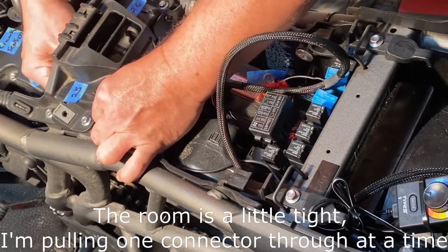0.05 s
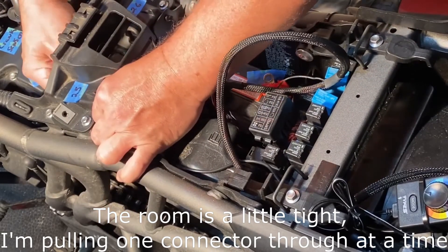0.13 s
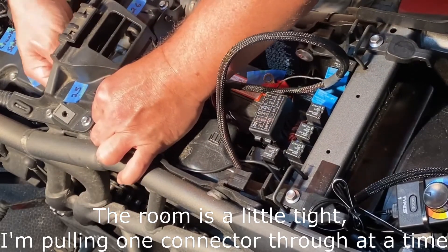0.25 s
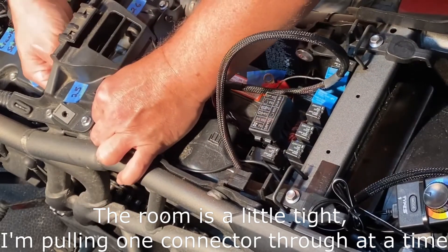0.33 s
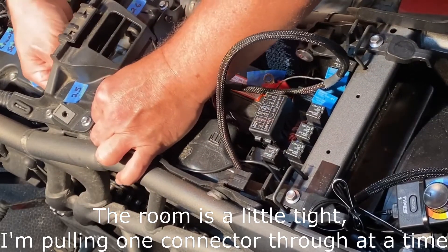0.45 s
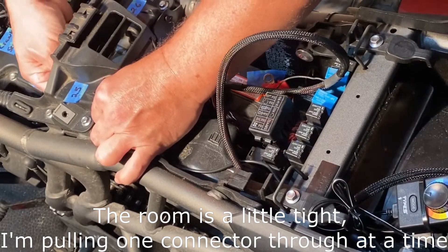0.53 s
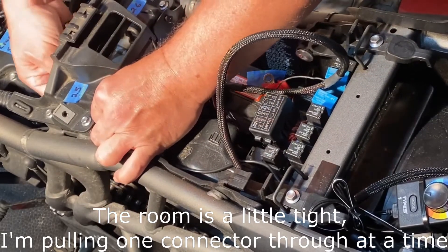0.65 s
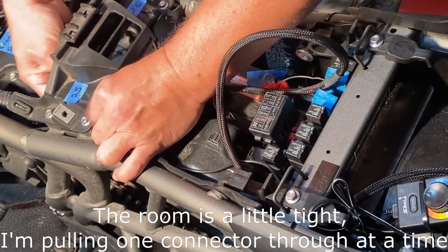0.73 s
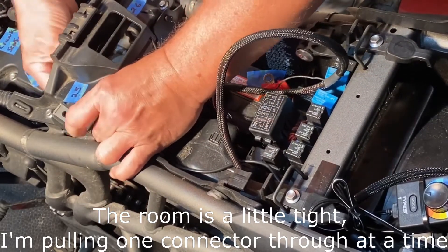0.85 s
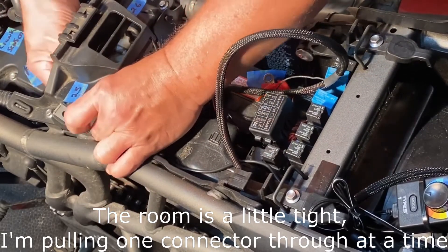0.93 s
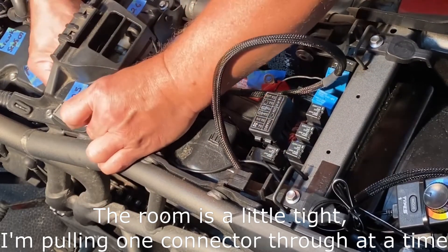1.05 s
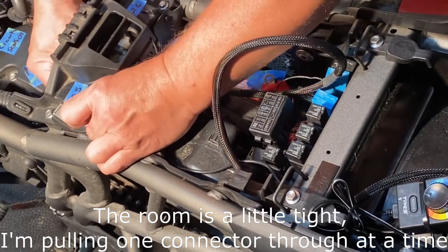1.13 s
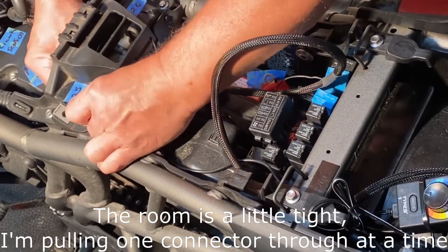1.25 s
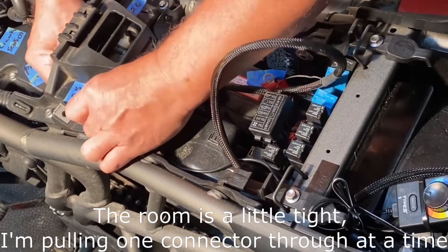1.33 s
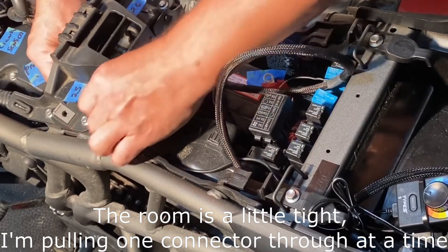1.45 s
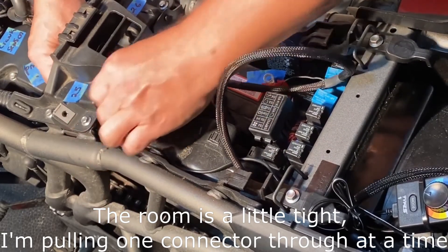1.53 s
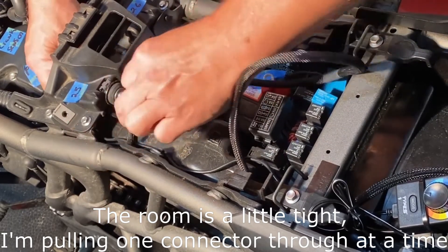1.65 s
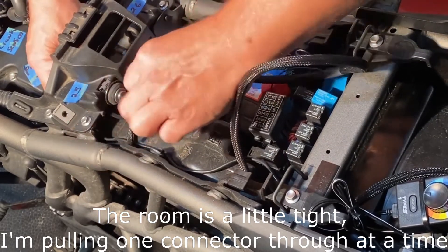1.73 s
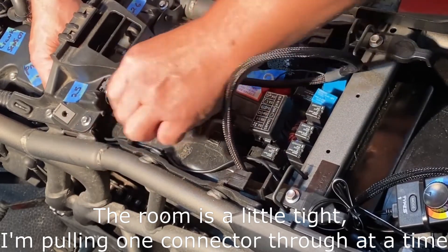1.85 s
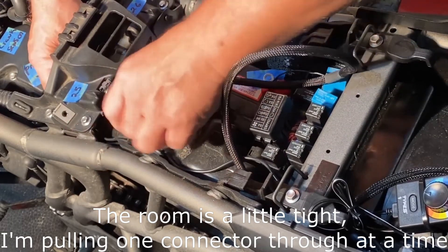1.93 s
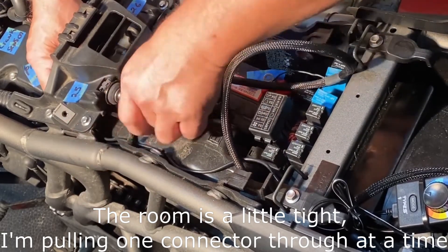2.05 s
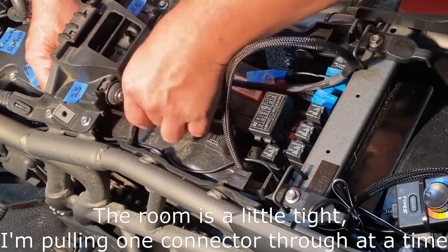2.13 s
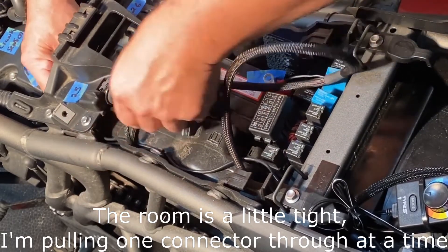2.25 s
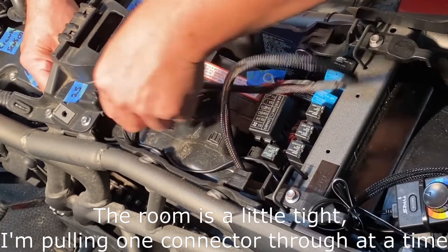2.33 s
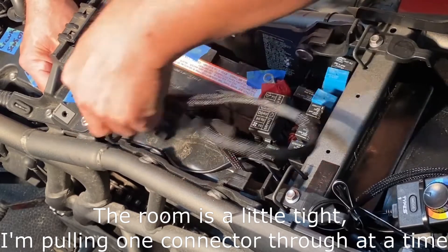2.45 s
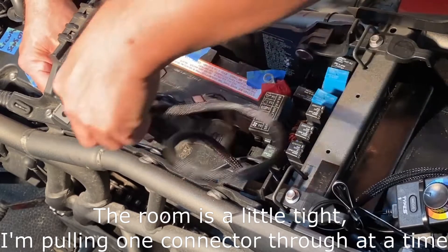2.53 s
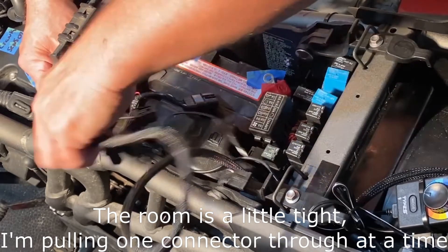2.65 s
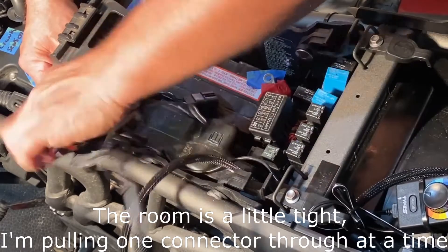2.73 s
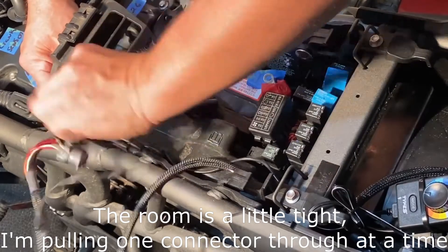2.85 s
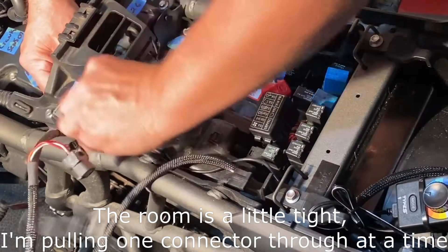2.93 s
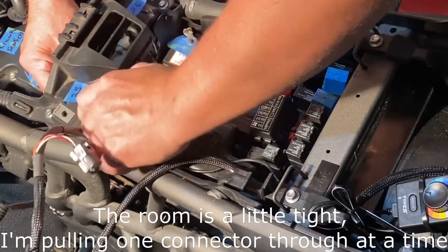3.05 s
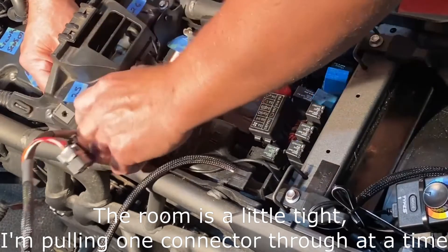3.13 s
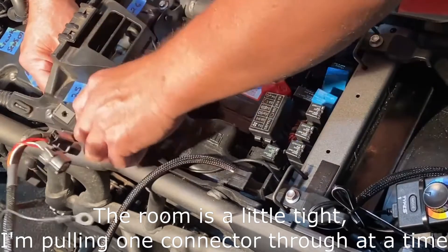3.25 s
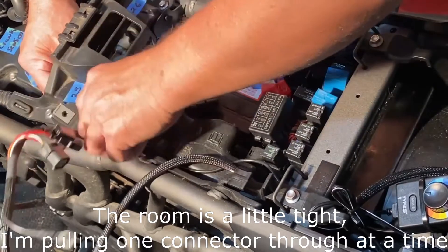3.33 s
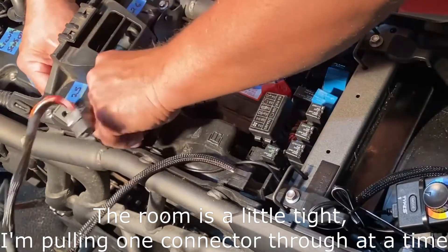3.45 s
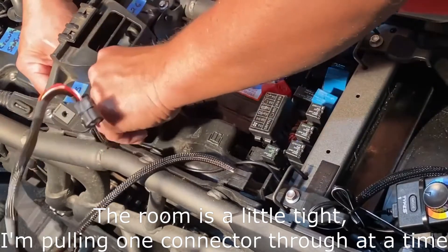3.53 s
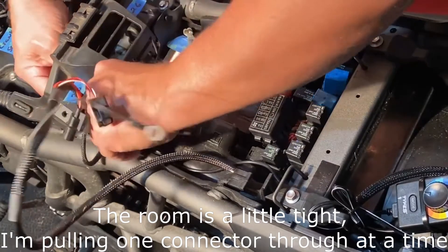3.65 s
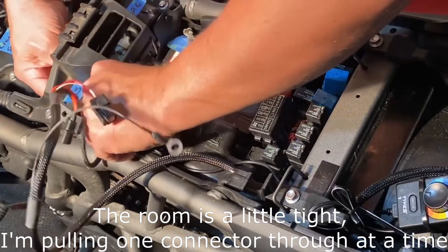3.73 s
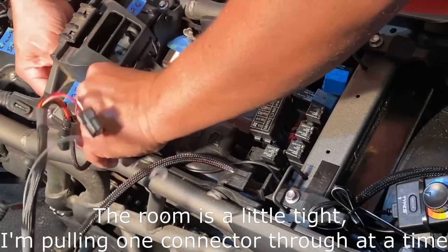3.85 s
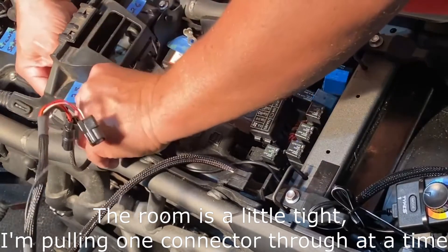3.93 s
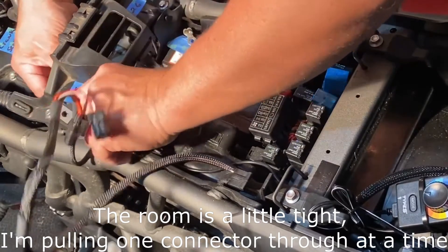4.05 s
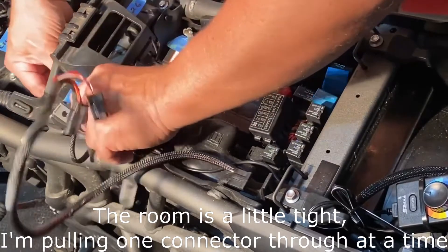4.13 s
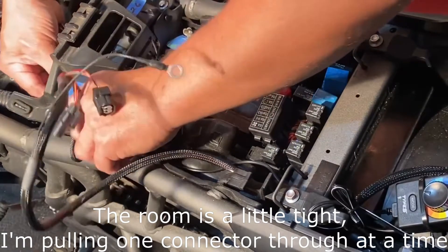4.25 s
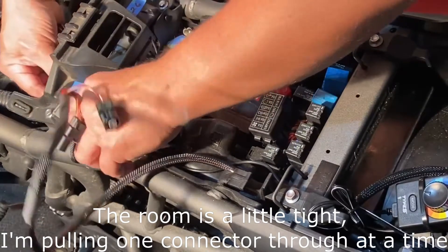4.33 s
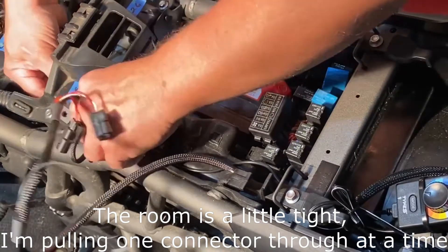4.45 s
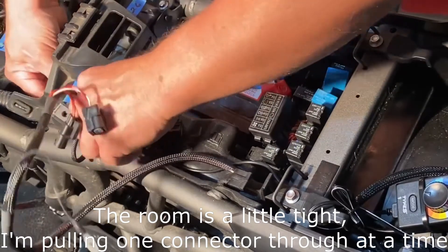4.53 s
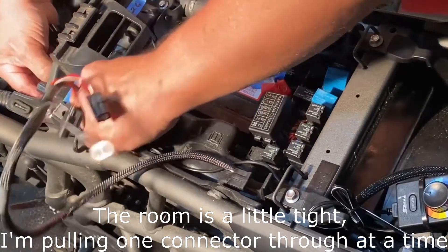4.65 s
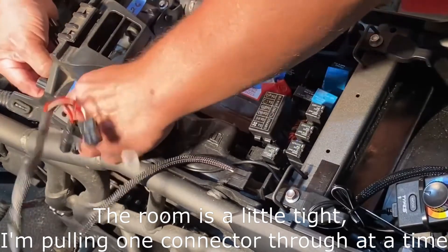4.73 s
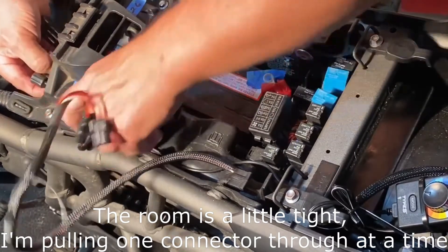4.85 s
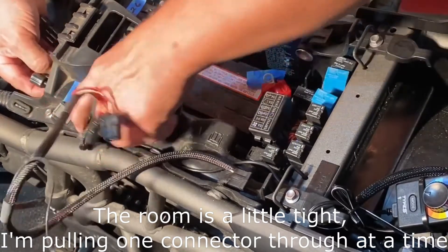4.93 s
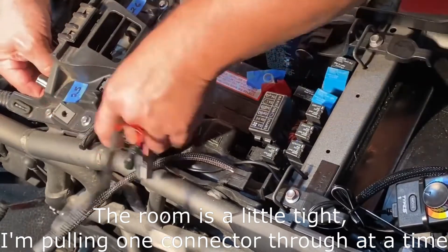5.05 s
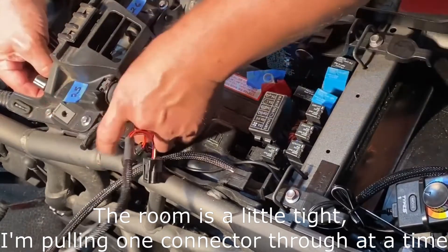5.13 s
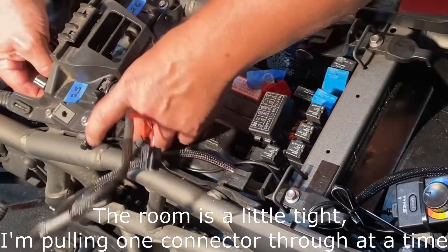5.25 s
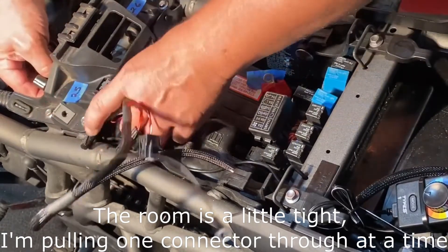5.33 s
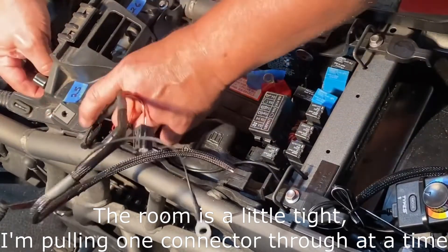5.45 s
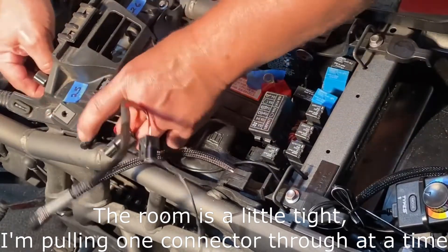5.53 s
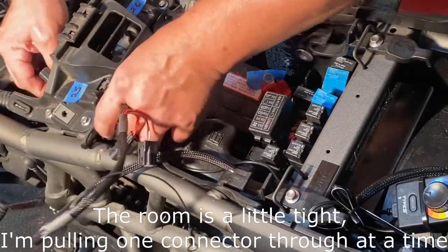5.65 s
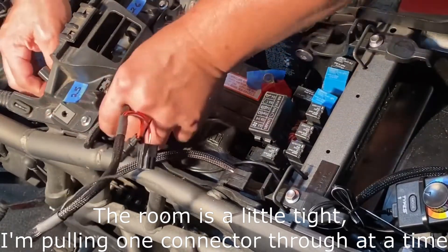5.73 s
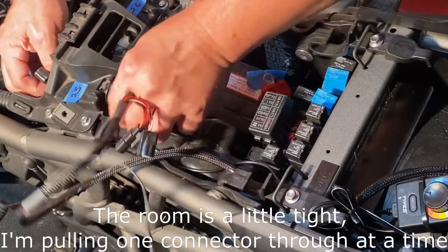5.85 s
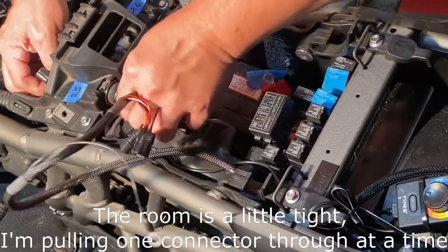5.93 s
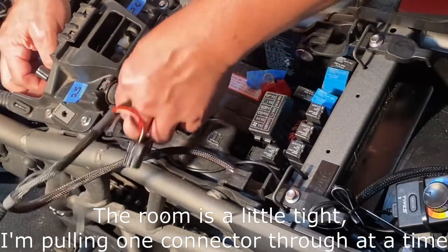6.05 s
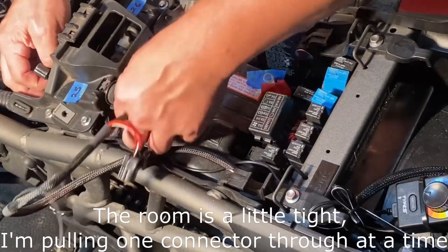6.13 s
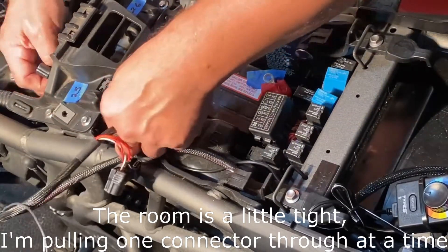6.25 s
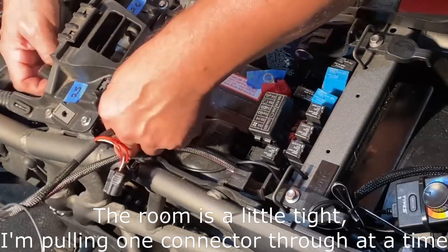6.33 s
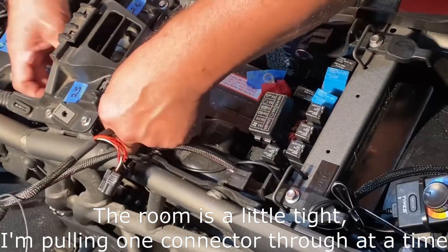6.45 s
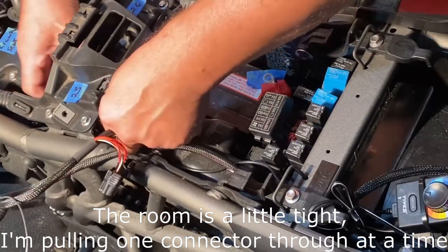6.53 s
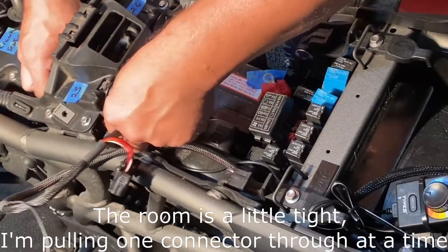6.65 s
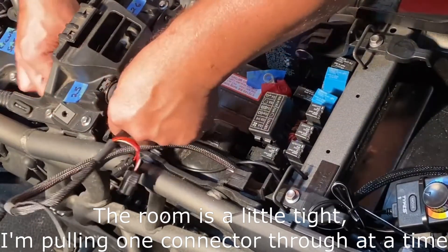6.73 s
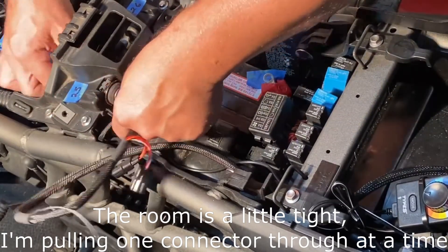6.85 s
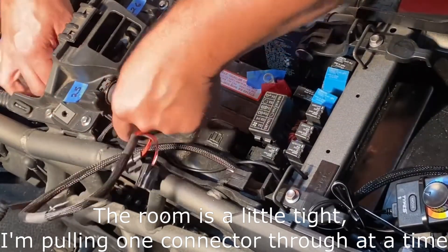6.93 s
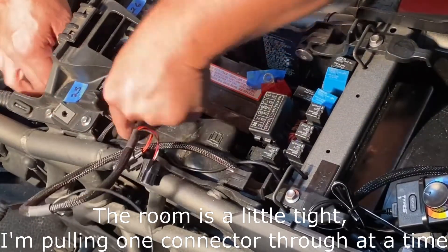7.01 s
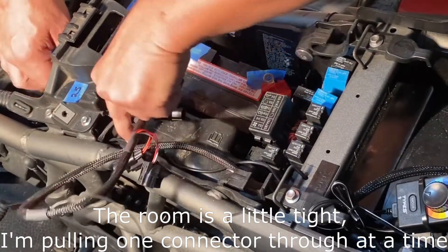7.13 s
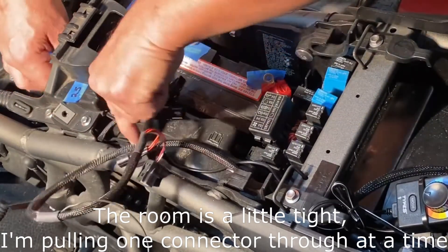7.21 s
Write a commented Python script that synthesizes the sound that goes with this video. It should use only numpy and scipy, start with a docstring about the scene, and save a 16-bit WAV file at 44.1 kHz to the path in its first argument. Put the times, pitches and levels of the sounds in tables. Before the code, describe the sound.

Hands work a wiring harness through a tight gap: dry plastic clacks, small rattles, raspy sleeve drag and tiny metallic ticks in a garage.

```python
"""Plastic connectors knock on hollow plastic housings as hands pull a wiring harness through a tight gap
in a machine frame. Each knock is a short push and rough contact that makes plastic parts ring.
A braided sleeve scrapes in many tiny jolts, and metal terminals tick with two high tones.
The garage answers these sounds with fading reflections.
Filtered noise makes far traffic and a gliding sine makes a faint hum underneath."""
import sys
import numpy as np
from scipy import signal
from scipy.fft import rfft, irfft, next_fast_len
from scipy.io import wavfile
from scipy.ndimage import uniform_filter1d

SR = 44100
rng = np.random.default_rng(int(sys.argv[2]) if len(sys.argv) > 2 else 0)


def digitize_waveform(pressure):
    """Quantize a signal to 16-bit integers and store it at the path in sys.argv[1].

    Rows of a 2-D input are taken as channels; values are limited to [-1, 1].
    """
    field = np.atleast_2d(pressure).T
    bounded = np.clip(field, -1, 1)
    quanta = np.round(bounded * 32767).astype(np.int16)
    wavfile.write(sys.argv[1], SR, quanta)


N = 321048  # length in samples

# The clear knocks. Each row: start in seconds, blow level in dB before the final mix, then levels in dB
# relative to the blow for hollow boom, panel, latch and edge snap, and contact time in ms.
KNOCKS = [(0.016, -59.5, 5.5, -10, -7, 2, 44), (0.1784, -49.5, 5, -11, -14, -11, 25),
          (0.1984, -39.5, -14, -12, -3.5, -4.5, 8.9), (0.236, -52, -8, 0, -12, -14, 4.6),
          (0.3133, -58, -4, 6, -4, -8, 8.5), (0.4459, -46, -27, -5, -11.5, -2.5, 5.5),
          (0.5621, -32, -17, -6.5, -15, -10.5, 4.7), (0.6509, -41, -10, 5, -6, -17, 4.7),
          (0.7427, -47.5, -10.0, -21, -14, -4, 34), (0.8195, -27.5, -21, -16.5, -11.5, -12, 5),
          (0.9328, -44.5, -4, -1.5, -9, -17, 12), (0.9677, -47, -14, -0.5, -7, -14, 21),
          (1.0121, -44, -12, -7, -14, -11, 8), (1.088, -46.5, -23, -6, -7, -9, 39),
          (1.165, -52, 3.5, -2, -22, -24, 8), (1.2087, -53, -6, 1.5, -19, -7, 7),
          (1.285, -42, -9, -8, -24, -15, 5.4), (1.3675, -35, -10.5, 0, -22, -23, 31),
          (1.4681, -36.5, -19, -2.5, -30, -33.0, 5.2), (1.5005, -37.5, -44.0, 4, -0.5, -5, 3.1),
          (1.5239, -13.5, -34, -7.5, -9.5, -10.5, 4.2), (1.5643, -19, -23.5, -11, -15.5, -12, 5.3),
          (1.5814, -27.5, -14.5, -4.5, -16, -21, 6.9), (1.7569, -45, -8, -1, -1, -7.5, 7.4),
          (1.909, -66, -17, -16, -18, -1, 3.8), (1.997, -38.5, -1, 2, -16, -20, 11),
          (2.0044, -40, 1.5, 10, -18, -9, 13.5), (2.0652, -27.5, -12.5, -9, -14.5, -9.5, 3.9),
          (2.1254, -51.5, -17, 13, -14, -17, 7.3), (2.2059, -19.5, -21, -4, -14.5, -20.5, 8),
          (2.2353, -35, -22, -1, -7, -10, 9.7), (2.2553, -29.5, -10, -12, -17, -19, 4.8),
          (2.3012, -22, -27, -8.5, -14, -30, 5.4), (2.3999, -28, -29, -4.5, -11, -17, 8.5),
          (2.4184, -42.5, -25, -3, -13, 5, 6), (2.4364, -35, -5, -5, -2, -1.5, 9.3),
          (2.4764, -27, -9, -5, -6.5, -16, 26), (2.4857, -41, -20.0, -13, -11, 2.5, 6.0),
          (2.5062, -15.5, -21.5, -14, -14.5, -26, 4.2), (2.5326, -22.5, -12.5, -3, -12.5, -17, 6.2),
          (2.9324, -39.5, -14, -7.5, -6.5, -11, 17), (2.9736, -62, -33.0, -24.0, 12, 11, 7.6),
          (2.9976, -13.5, -33, -10, -8, -13, 7.5), (3.0999, -20.5, -19.5, -11, -6, -6.5, 5.6),
          (3.116, -21.5, -22, -13.5, -6, -7, 6.2), (3.1954, -36, -13, -1.5, -19, -15, 25),
          (3.2294, -38.5, -0.5, 3, -9.5, -12, 17), (3.471, -24, -31, -10.5, -10.5, -23, 4.7),
          (3.513, -28, -15.5, -2, -17, -26, 14.5), (3.5843, -40, -20, 0, -3, -8, 19),
          (3.6022, -20, -17, -5, -17.5, -26, 9.2), (3.6401, -20.5, -12, -2, -11.5, -18.5, 21),
          (3.6554, -31, -7, -9, -1.5, -6, 16), (3.686, -27, -20, 2, -4.5, -27.0, 3.7),
          (3.7469, -22.5, -26, -8.5, -25, -13, 3.3), (3.8013, -28.5, -17, -12, -22, -17.5, 13),
          (3.8412, -30.5, -13, -18, -10.5, -15, 13), (3.9085, -32.5, -34, -19, -5.5, -12.5, 4.7),
          (4.0372, -35, -11, -14, -8, -19, 9.5), (4.0856, -27, -10, -10, -33, -30, 8.7),
          (4.1011, -24.5, -18.0, -4, -3.5, -18, 5.8), (4.1385, -17, -36.0, -16, -15, -21, 7.5),
          (4.1525, -12.5, -16.5, -25.0, -15.5, -25, 6), (4.1654, -23.5, -17, -8, -10, -11, 11.5),
          (4.2009, -14.5, -43, -18, -11, -28, 3.7), (4.2173, -19, -34, -8.5, -6.5, -21, 5.1),
          (4.2408, -22.5, 0, 1.5, -3, -9.5, 14.6), (4.3164, -49.5, 10.5, -11, 3, 5, 17),
          (4.4108, -56, 9, -10, 5, -12, 23), (4.4442, -39, -30, -24, -9, -6.5, 8.6),
          (4.4792, -39, -34.0, 9, -0.5, -6, 7.3), (4.5116, -27.5, -15, -4.5, -11, -22, 4.6),
          (4.6024, -31.5, -20, -0.5, -10, -14, 14), (4.6135, -24.5, -5.5, 3.5, -10.5, -19, 11.5),
          (4.6237, -24, -6, -7, -13, -16.5, 16), (4.6634, -42.5, -13, 5, -3, 1.5, 19),
          (4.6862, -39, -25, -19, -7, 8.5, 9.2), (4.7351, -38, -16, -1.5, -3, 0.5, 10.5),
          (4.752, -39, -17, -10, -18, -3.5, 7.7), (4.8399, -41.5, -10, 3.5, -20, -18.5, 13.5),
          (4.9018, -36.5, -12, 4, -2, -4.5, 11.7), (4.939, -37.5, -25, -1.5, -17, -28, 4.4),
          (5.0005, -38.5, -27, 0, -1.5, -3.5, 2.8), (5.033, -30, -24, -2, -19, -24, 4.4),
          (5.0454, -29.5, -13, 1.5, -11.5, -12, 4.4), (5.0664, -31, -34, 4.5, -5, -13, 8.4),
          (5.0924, -29, -10.5, -0.5, -15, -12, 21), (5.1264, -30.5, -17, -4, -12, -11, 4.6),
          (5.1662, -27, -34, -5, -8, -19, 2.5), (5.2739, -19, -18.5, 1, -16, -18.5, 6.2),
          (5.2824, -37.5, -19, 9, -9, -20, 3.7), (5.3687, -24.5, -26, -13, -13.5, -25, 3.8),
          (5.4075, -36.5, -21, -21, -12, -20, 6.7), (5.4744, -43, -8, 2, -5, -21, 9.3),
          (5.5024, -30.5, -21, -5, -14, -16, 5.4), (5.6236, -36, -25, -11, -16, -9.5, 8.1),
          (5.661, -7, -27.5, -3.5, -11.5, -10.5, 5.7), (5.9074, -29.5, -29, -25, -18, -10.5, 11),
          (5.9254, -29, -11.5, 1.5, -16, -16.5, 32), (5.9604, -37.5, 0, 10, -13, -18, 4),
          (5.9763, -32, -10, -5, -13, -2.5, 3.8), (6.0442, -30.5, -1, -5.5, -29, -12, 8),
          (6.1244, -48, -6, 8, -13, -19.0, 25), (6.2, -33.5, -23, -8, -13, -13, 8.6),
          (6.221, -44.5, -12, -5, -5.5, 0, 12), (6.3031, -40.5, -9, -10, -1, -3.5, 6.3),
          (6.3389, -42.5, -20, -10, -4, -7, 3.6), (6.3864, -40, -2.5, 8.5, -30, -26, 7.4),
          (6.4242, -41, -9, -10, -12, -9, 6.2), (6.4532, -54, 9, 12.5, -17, 0, 36),
          (6.5054, -48.5, -1.5, 10.5, -9, -9, 38), (6.5375, -34.5, -18, -3.5, -7, -3, 9.1),
          (6.5554, -39.5, -13, 3.5, -5, 4, 6.3), (6.589, -30, -30, -26, -21, -27, 3.7),
          (6.766, -38.5, -16, -1, -10, -1, 9.3), (6.82, -40, -26, 3.5, -12, -15, 8.1),
          (6.8329, -34.5, -13, 0, -10, -25, 4), (6.8473, -28.5, -34, -3.5, -19, -19.0, 14),
          (6.87, -41.5, -13, 0, -1, -11, 6.8), (6.9505, -39, -9, 0, -14, -16, 19),
          (6.9631, -32, -20, 4.5, -6, -19.0, 9.3), (6.975, -24, -12, 0.5, -14.5, -15.5, 7.6),
          (6.9824, -35, -5, 5, -9, -15, 9.1), (7.219, -35.5, -21, -6, -13, -16.5, 21),
          (7.2654, -36, -16, -9, -15, -32, 11)]
# The ways the plastic parts ring. Each row: family (0 boom, 1 panel, 2 shell, 3 latch), pitch in Hz,
# strength in dB within its family, time to fade by 60 dB in seconds, random detuning as a share of the pitch.
RINGING_MODES = [(0, 401, 6, 0.032, 0.014), (1, 726, 14, 0.019, 0.032), (1, 785, 16, 0.013, 0.027),
                 (1, 922, -6, 0.018, 0.0067), (2, 1266, 4, 0.0054, 0.056), (2, 1632, 2.5, 0.025, 0.022),
                 (2, 1688, -1.5, 0.026, 0.0069), (2, 1837, 2.5, 0.01, 0.05), (3, 2178, 1, 0.012, 0.024),
                 (3, 2572, 1.5, 0.012, 0.055), (3, 2990, 2.5, 0.0076, 0.018), (3, 3587, -1, 0.0084, 0.12),
                 (3, 3900, -3.5, 0.0029, 0.12), (3, 4630, 4, 0.0022, 0.1)]
# The broad snap of hard plastic edges. Each row: frequency in Hz, relative strength in dB.
EDGE_SNAP = [(2000, -38), (3000, 0.5), (5500, 10.5), (8000, 10.5), (10000, 8), (12500, 3.5), (16000, -17)]
# The sleeve dragged over the housings. Each row: time in seconds, level of the ringing in dB
# before the final mix, level of the bright rasp in dB relative to that ringing.
SCRAPE = [(0.0, -70, 4), (0.35, -70, -13), (0.7, -69, -4), (0.799, -57.5, -1.5), (1.081, -56, -8),
          (1.26, -58.5, -3), (1.381, -56, -8.5), (1.56, -54, -3), (1.8, -60.5, -18), (1.97, -68, -11),
          (2.1, -56, -2.5), (2.43, -46.5, -17), (2.74, -59, -9), (3.0, -60.5, 6), (3.12, -50.5, -33),
          (3.528, -57.5, -3.5), (3.69, -53, 4), (3.89, -69, -9), (4.12, -44.5, -8), (4.28, -47.5, -8.5),
          (4.56, -52, -20), (4.63, -42.5, -7), (4.74, -59, -4), (4.85, -46.5, -6), (4.96, -56.5, -7),
          (5.1, -45, -1.5), (5.22, -70, 0), (5.48, -46, -14.5), (5.68, -62, -4), (5.88, -48, -14),
          (6.14, -58, -5.5), (6.45, -57.5, -1.5), (6.68, -59.5, -3.5), (6.82, -54, -5), (6.93, -57, -20),
          (7.28, -58, -1.5)]
# Metal terminals ticking on something hard. Each row: start in seconds, peak level in dB before the
# final mix, pitch in Hz, level of a second, lower ring in dB relative to the first.
TERMINAL_TICKS = [(0.2, -38, 7580, 2), (2.0648, -30, 6100, -33), (2.1688, -33.5, 5800, -18),
                  (2.939, -29, 8010, -31), (4.1323, -33, 8050, -15), (4.1664, -37, 5500, -22.5),
                  (4.318, -37, 7820, -17), (5.0165, -36.5, 9100, -5), (5.128, -33, 7750, -21),
                  (5.909, -31, 4950, -14), (5.977, -34.5, 5730, -28), (6.0093, -26.5, 5900, -25),
                  (6.061, -39, 7570, -13), (6.221, -38, 7900, -12), (6.557, -18, 7780, -12),
                  (6.766, -31, 7700, -22), (7.217, -44, 9200, -14)]
# How the garage echoes. Each row: frequency in Hz, time to fade by 60 dB in seconds, relative strength in dB.
GARAGE = [(275, 0.72, 7.5), (860, 0.9, 0.5), (1260, 0.81, 7), (1540, 0.82, 1.5), (2800, 0.65, 3),
          (4400, 0.68, 2.5), (9100, 0.46, 3.5), (15100, 0.13, 10.5)]
# The balance of the traffic noise. Each row: frequency in Hz, relative strength in dB per Hz.
TRAFFIC = [(25, -30), (42, -9), (57, -1), (75, -6.5), (120, -9), (170, -8.5), (300, -13.5), (480, -16),
           (1040, -21.5), (2300, -36), (6000, -47), (16000, -56)]
# The far hum. Each row: time in seconds, pitch in Hz, level in dB before smoothing and the tone curve.
HUM = [(.9, 166, -78), (1.02, 166.7, -67.5), (2.25, 164, -63.5), (2.45, 160.5, -67.5), (3.2, 160, -75)]
# How alike the two ports hear. Each row: frequency in Hz, left-right likeness from 0 to 1.
LIKENESS = [(60, 0.98), (130, 0.93), (430, 0.81), (640, 0.39), (1410, 0.93), (3100, 1), (6820, 0.82),
            (15000, 0.68)]
# How far the left port runs ahead. Each row: frequency in Hz, phase lead in radians.
LEFT_LEAD = [(0, 0), (950, 0.35), (1550, -0.2), (3100, 0.6), (5080, 0.4), (6030, -0.4), (7750, 0.1),
             (8100, 1.9), (8870, 2.0), (11600, -0.7), (13000, -2.9), (14300, -3.8), (15200, -6.1),
             (16500, -6.3)]
# How much louder the left port is. Each row: frequency in Hz, level difference in dB.
LEFT_LOUDER = [(60, -2), (180, -1.5), (420, -2), (760, -3), (1150, 5), (1650, 0), (4970, 0), (15000, 0)]
# Overall tone: the deepest bass is cut and the top treble slightly uneven. Each row: frequency in Hz, gain in dB.
TONE_CURVE = [(22, -35), (45, 2.5), (12300, -4), (13300, -1), (14300, 5)]

RING_SAMPLES = 3072  # room for one knock
SHELL_DB = -8  # shell ringing, relative to the blow
BOOM_RISE_S = 0.0048  # the hollow fills slowly
MODE_SPREAD_DB = 1.5  # each blow lands elsewhere and favours other modes
SNAP_SPREAD_DB = 1.5  # each edge favours its own bands
SMALL_PARTS_HZ = 363  # below this the parts are too small to radiate

TAP_COUNT = 70
TAP_DB, TAP_SPREAD_DB = 8, 2.5  # light taps relative to the scrape level
TAP_COLOUR_DB = (-14, -11, -11, -15)  # boom, panel, latch and edge snap, relative to the tap
TAP_COLOUR_SPREAD_DB = 3.5
TAP_CONTACT_MS = (2.5, 8)  # shortest, longest

SLIPS_PER_S, CLUMP_DB = 3200, 4.0  # average rate, and how much the slips bunch
TICKS_PER_S, TICK_SPREAD_DB = 400, 4.5  # braid strands that let go one by one
TICK_DB = 0  # strand ticks relative to the slips

TERMINAL_T60_S, LOWER_RING_SHARE = 0.018, 0.82  # fade by 60 dB; lower pitch as a share of the upper one
GARAGE_DB, TRAFFIC_DB = -8, -57.5  # echo gain and traffic level, before the final mix
BAND_LIMIT_HZ = 16300


def knocks():
    """A blow and a short chatter make the housings ring; the edges snap hardest at first touch."""
    t, out = np.arange(RING_SAMPLES) / SR, np.zeros((2, N))
    rows = np.r_[KNOCKS, taps()]
    noise = rng.standard_normal((len(rows), 5, RING_SAMPLES))
    push = 2.22 * np.exp(-0.5 * ((t - 0.0006) / 0.00008) ** 2)  # one hard, very short push
    crack = 1.0 * (t == t[24])  # its sharp edge, a single sample
    for (s, blow_db, boom_db, panel_db, latch_db, edge_db, contact_ms), chance in zip(rows, noise):
        age = t / (max(contact_ms, 0.5) / 1000)  # 1 at the contact time
        touch = (1 - np.exp(-age / 0.065)) * np.exp(-age ** 3)
        rough = chance[:4] * abs(chance[:4])  # squaring the size makes the noise spikier
        drive = push + touch * rough[:2]
        rings = signal.fftconvolve(drive[None], housings(chance[4])[:, None], axes=2)
        snap = coloured(crack + touch * rough[2:] * np.exp(-1.2 * age), EDGE_SNAP)
        patches = np.c_[np.geomspace(3000, 15000, num=12), SNAP_SPREAD_DB * chance[4, -12:]]
        parts = [*rings[:, :, :RING_SAMPLES], coloured(snap, patches)]
        sound = 0
        for level_db, part in zip((boom_db, panel_db, SHELL_DB, latch_db, edge_db), parts):
            # the loudest stretch of about 5 ms sets each part's level
            loudest = np.sqrt(uniform_filter1d(part ** 2, 220).max(1, keepdims=True))
            sound = sound + gain_of(level_db) * part / loudest
        add(out, s, gain_of(blow_db) * sound)
    return out


def taps():
    """Light taps at chance moments follow the strength of the sleeve's drag; rows as for the knocks."""
    s, level_db, _ = np.transpose(SCRAPE)
    at, slowness = rng.random((TAP_COUNT, 2)).T
    start = at * N / SR
    chance = rng.standard_normal((TAP_COUNT, 5))
    blow_db = np.interp(start, s, level_db) + TAP_DB + TAP_SPREAD_DB * chance[:, 0]
    colour_db = np.add(TAP_COLOUR_DB, TAP_COLOUR_SPREAD_DB * chance[:, 1:])
    return np.c_[start, blow_db, colour_db, np.interp(slowness, (0, 1), TAP_CONTACT_MS)]


def housings(chance):
    """Hollow, panel, shell and latch each ring as fading sines; chance shifts their pitch and strength."""
    t, rings = np.arange(RING_SAMPLES) / SR, np.zeros((4, RING_SAMPLES))
    for k, (family, hz, db, t60, spread) in enumerate(RINGING_MODES):
        turns = hz * (1 + spread * chance[k]) * t
        fade = gain_of(db + MODE_SPREAD_DB * chance[-20 - k] - 60 * t / t60)
        rings[round(family)] += (-1) ** k * fade * np.sin(2 * np.pi * turns)  # neighbours alternate in sign
    rings[0] *= 1 - np.exp(-t / BOOM_RISE_S)
    return rings / np.linalg.norm(rings, axis=1, keepdims=True)


def scrape():
    """The sleeve sticks and slips in dense clumps and its strands tick, making the same housings ring."""
    s, level_db, bright_db = np.transpose(SCRAPE)
    t = np.arange(N) / SR
    clumps = evened(uniform_filter1d(uniform_filter1d(rng.standard_normal(N), 900), 900))
    slip_db = 1.1 * np.minimum(rng.exponential(1, N), 4) + CLUMP_DB * clumps
    jolts = gain_of(slip_db) * (rng.random(N) < SLIPS_PER_S / SR)
    slips = signal.oaconvolve(jolts[None], np.hanning(120)[None], "same") * rng.standard_normal((2, N))
    tick_db = TICK_SPREAD_DB * np.minimum(rng.exponential(1, N), 4)
    ticks = gain_of(tick_db) * (rng.random(N) < TICKS_PER_S / SR)
    ticks = signal.oaconvolve(ticks, np.exp(-t[:300] / 0.0021))[:N] * rng.standard_normal((2, N))
    drag = evened(slips) + gain_of(TICK_DB) * evened(ticks)
    shares = gain_of([[-7], [-5], [-3], [-5]])  # boom, panel, shell, latch
    ring = (shares * housings(np.zeros(RING_SAMPLES))).sum(0)
    body = signal.oaconvolve(drag, ring[None], axes=1)[:, :N]
    # the rasp takes the two drag signals in the other order, so it differs from the ringing
    rasp = evened(coloured(drag[::-1], EDGE_SNAP)) * gain_of(np.interp(t, s, bright_db))
    return (evened(body) + rasp) * gain_of(np.interp(t, s, level_db))


def terminal_ticks():
    """A brief scratchy touch on metal sets off a high ring and a second ring below it."""
    t, out = np.arange(1024) / SR, np.zeros((2, N))
    noise = rng.standard_normal((len(TERMINAL_TICKS), 1024))
    for (s, db, hz, lower_db), chance in zip(TERMINAL_TICKS, noise):
        upper = np.sin(2 * np.pi * hz * t)
        lower = gain_of(lower_db) * np.sin(2 * np.pi * LOWER_RING_SHARE * hz * t)
        ring = gain_of(-60 * t / TERMINAL_T60_S) * (upper + lower)
        scratch = chance * np.exp(-t / 0.0014)
        tick = np.convolve(scratch, ring)[:1024]
        add(out, s, gain_of(db) * tick / abs(tick).max() * np.ones((2, 1)))
    return out


def garage(x):
    """Scattered reflections, strongest from the frame close by, fade at a different speed in each band."""
    reflections = np.zeros((4, SR))
    at = np.arange(120, SR - 20, 20) + rng.integers(0, 20, (4, (SR - 121) // 20))
    strength = 1 + 3.44 * np.exp(-at / SR / 0.0057)
    np.put_along_axis(reflections, at, rng.choice([-1., 1.], at.shape) * strength, 1)
    hz, t, bands = signal.stft(reflections, SR, nperseg=256)
    band_hz, t60, db = np.transpose(GARAGE)
    start_db = read(np.c_[band_hz, db], hz)[:, None]
    decay_db = start_db - 60 * t / read(np.c_[band_hz, t60], hz)[:, None]
    tail = signal.istft(bands * gain_of(decay_db), SR, nperseg=256)[1]
    tail = tail / np.linalg.norm(reflections[:2, :SR // 20])
    paths = signal.fftconvolve(np.r_[x, x[::-1]], tail, axes=1)[:, :N]
    return paths[:2] + paths[2:]  # each output gathers echoes of both input signals


def traffic():
    """Far traffic and air are steady noise, shaped to be strongest in the bass."""
    return gain_of(TRAFFIC_DB) * evened(coloured(rng.standard_normal((2, N)), TRAFFIC))


def hum():
    """One faint low sine glides in pitch and comes and goes."""
    s, hz, db = np.transpose(HUM)
    t = np.arange(N) / SR
    level = np.sqrt(2) * gain_of(np.interp(t, s, db, -120, -120))
    turns = np.cumsum(np.interp(t, s, hz)) / SR
    return uniform_filter1d(level, 4000) * np.sin(2 * np.pi * turns)


def ports(pair):
    """Of two microphone ports, the right hears a shifted share of the left and a share of its own."""
    size = next_fast_len(pair.shape[1])
    hz = np.fft.rfftfreq(size, 1 / SR)
    same = np.clip(read(LIKENESS, hz), 0, 1)
    left, own = rfft(pair, size)
    right = same * left * np.exp(-1j * read(LEFT_LEAD, hz)) + np.sqrt(1 - same ** 2) * own
    lean = gain_of(read(LEFT_LOUDER, hz) / 2)  # half the difference goes to each side
    return irfft(np.array([left * lean, right / lean]), size)[:, :N]


def gain_of(db):
    """Turns decibels into a plain multiplier."""
    return 10 ** (np.asarray(db) / 20)


def evened(x):
    """Scales a sound to an average (rms) level of 1."""
    return x / np.sqrt(np.mean(x ** 2) + 1e-20)


def read(points, hz):
    """Reads between the rows of a table along a log-frequency axis."""
    f, value = np.transpose(points)
    return np.interp(np.log(hz + 1), np.log(f + 1), value)


def coloured(x, points):
    """Boosts or cuts each frequency by a table in dB."""
    hz = np.fft.rfftfreq(x.shape[-1], 1 / SR)
    return irfft(rfft(x) * gain_of(read(points, hz)), x.shape[-1])


def add(mix, s, sound):
    """Mixes a sound in, starting at a time in seconds."""
    part = mix[:, max(round(s * SR), 0):][:, :sound.shape[1]]
    part += sound[:, :part.shape[1]]


def scene():
    """Two ports hear the harness, its garage echo and the traffic; the hum is added equally to both."""
    small = signal.butter(N=8, Wn=SMALL_PARTS_HZ, btype="high", fs=SR, output="sos")
    harness = signal.sosfilt(small, knocks() + terminal_ticks() + scrape())
    around = harness + gain_of(GARAGE_DB) * garage(harness) + traffic()
    return ports(around) * gain_of(-3.0) + hum()


def record(dry):
    """A tone curve shapes the sound, then a filter removes the highest treble."""
    shaped = coloured(dry, TONE_CURVE)
    low_pass = signal.firwin(511, BAND_LIMIT_HZ, window=("kaiser", 9), fs=SR)
    return signal.oaconvolve(shaped, low_pass[None], "same")


dry = scene()
out = record(dry)
digitize_waveform(out)
```